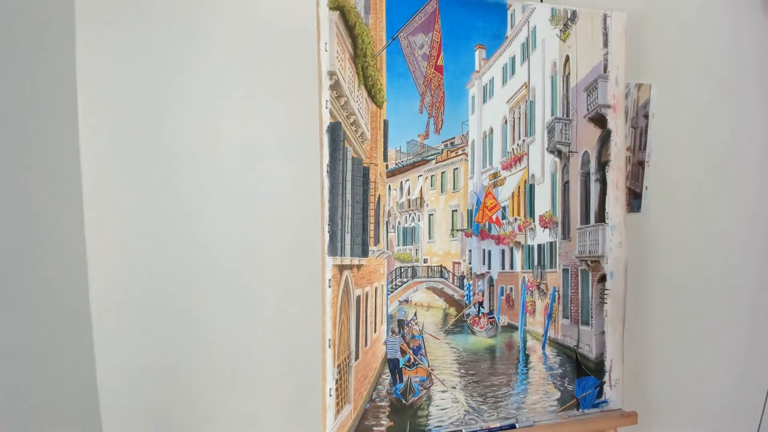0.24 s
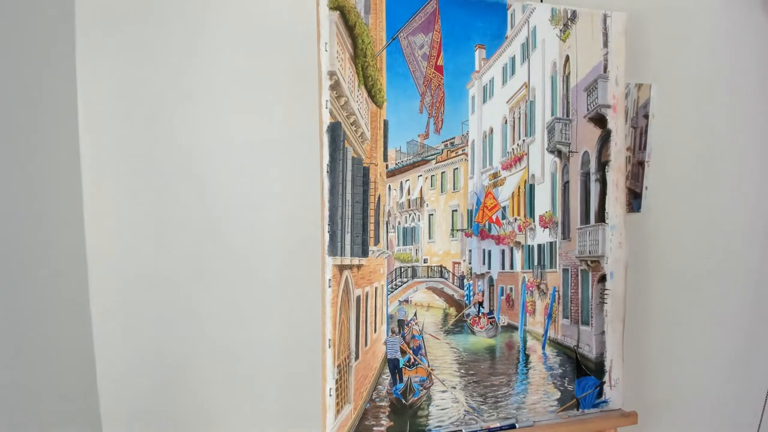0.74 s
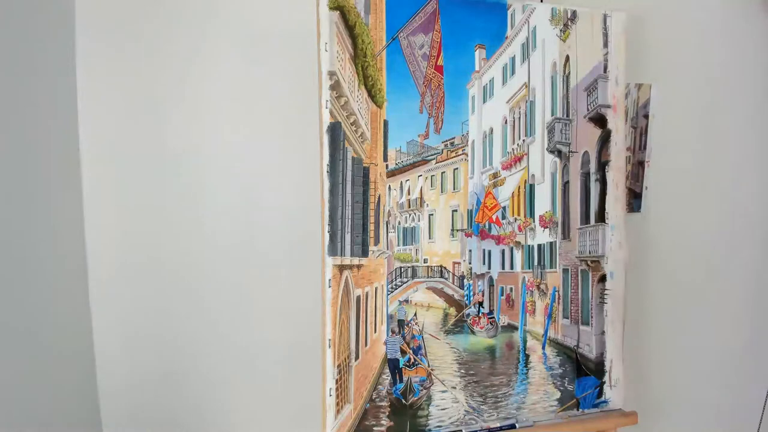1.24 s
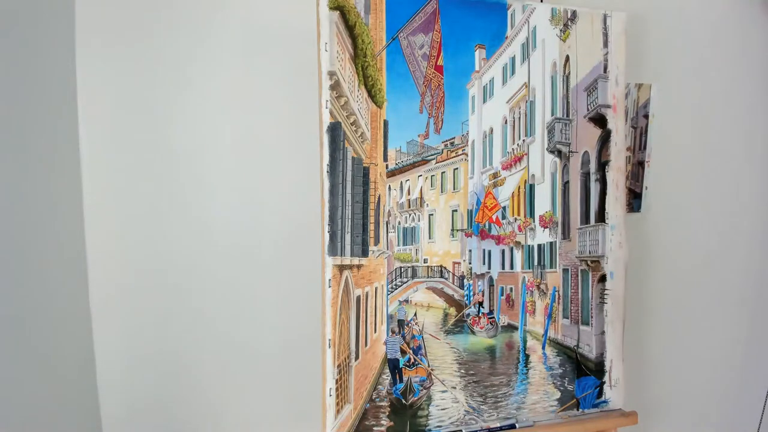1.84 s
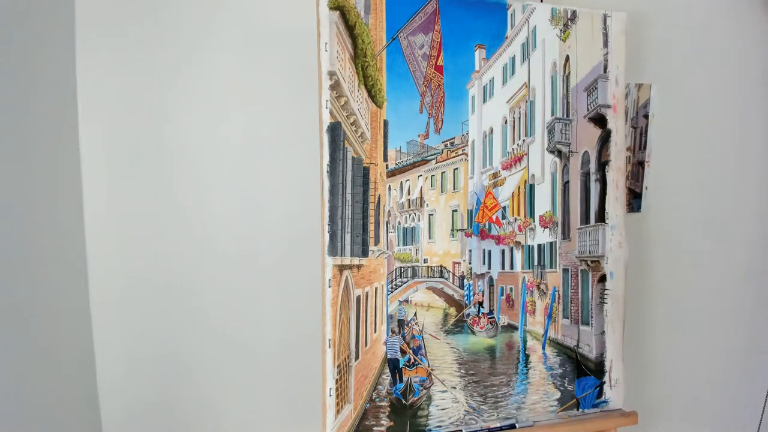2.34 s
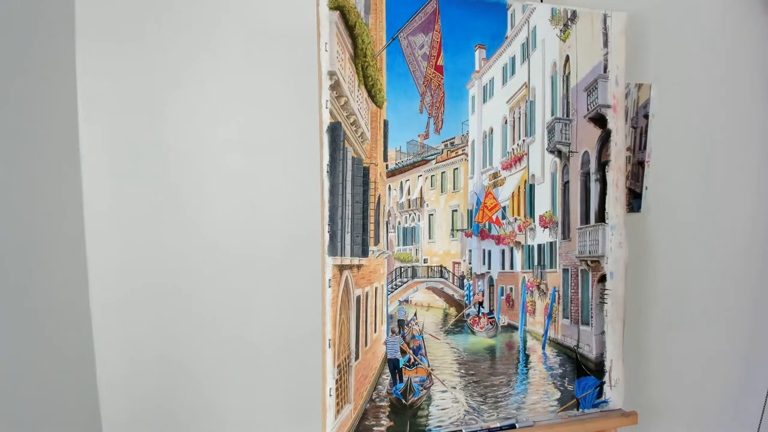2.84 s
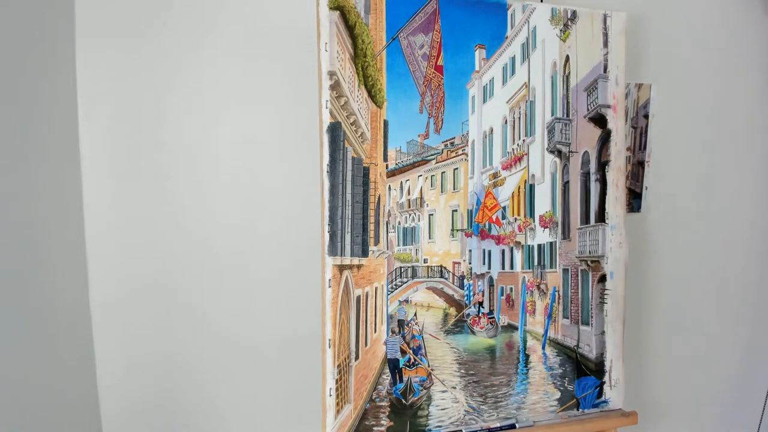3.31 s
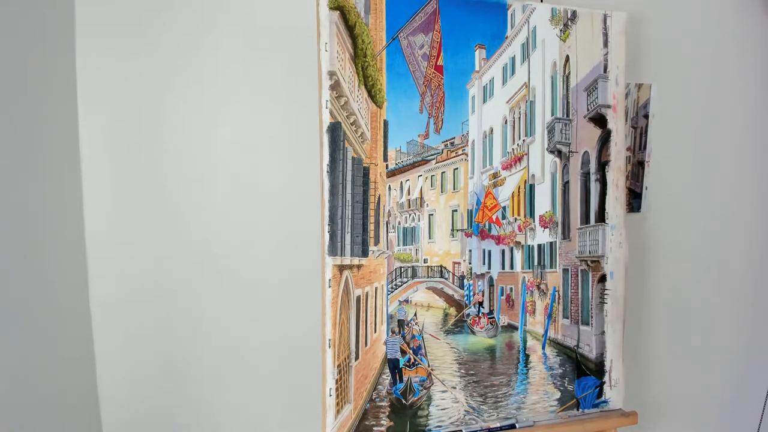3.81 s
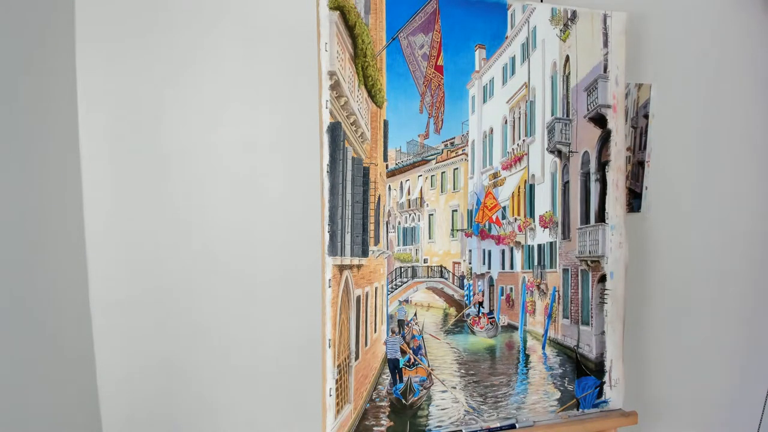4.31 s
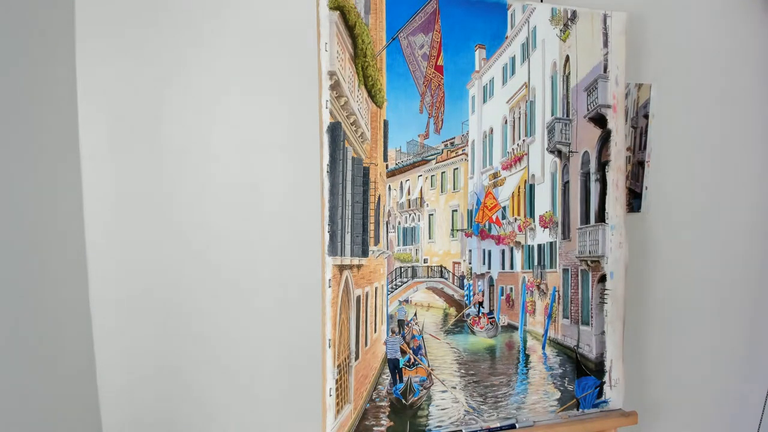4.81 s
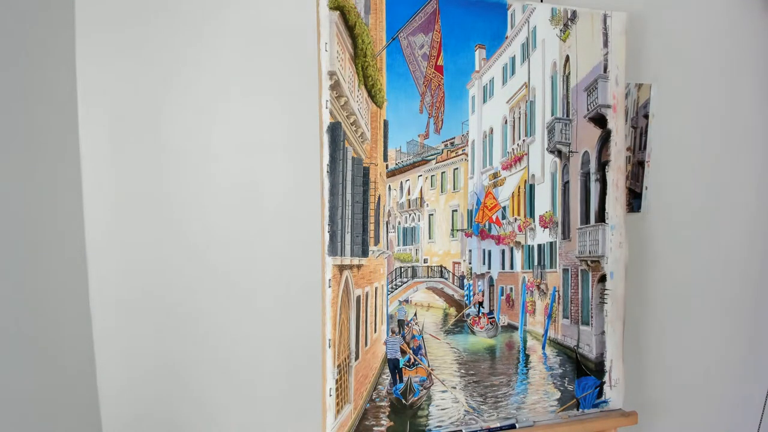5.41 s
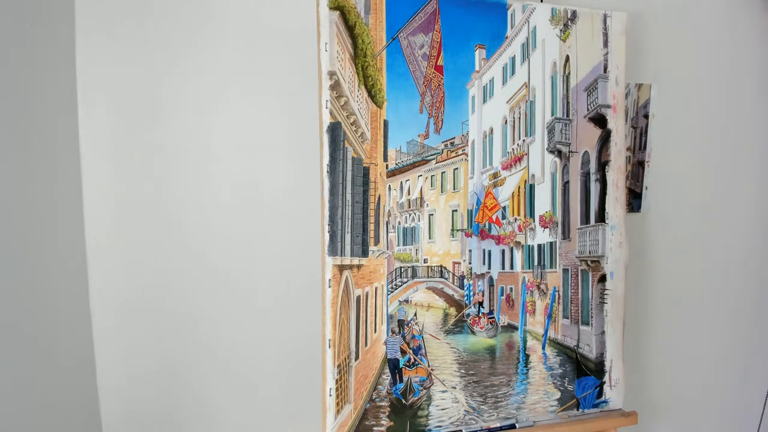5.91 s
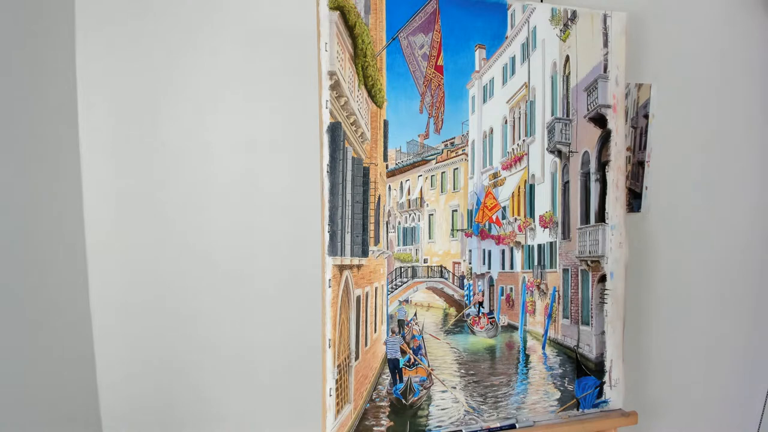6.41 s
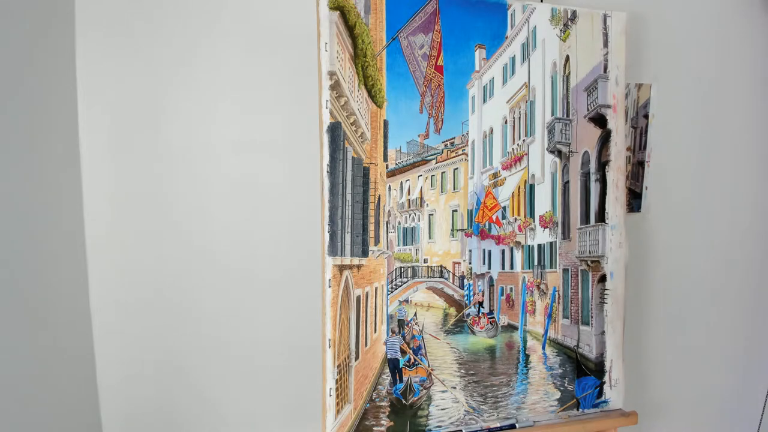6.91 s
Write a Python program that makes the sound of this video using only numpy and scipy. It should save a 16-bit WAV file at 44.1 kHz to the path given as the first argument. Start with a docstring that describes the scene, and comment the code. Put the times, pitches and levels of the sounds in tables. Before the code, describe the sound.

A bare indoor studio with low room air and a faint wavering tone, in mono from a few steps away. Slight ticks and rustling open it; a modest wooden knock comes at 0.5 s, dull low footfalls at 0.7 to 1.0 s, and a louder, fuller double knock at 1.1 s with a rub. Another soft step at 1.5 s, then near quiet with tiny squeaks and a tick until 3.2 s. At 3.26 s an electric pencil sharpener jumps into life: a piercing gear whine, plastic rattle, low growl and splintery hiss, its pitch sagging and lurching as the blade bites, growing slightly louder. Switched off at 5.0 s, it slides down in pitch with loose clattering gears and a bright tick, gone by about 5.3 s. Faint thuds of steps at 5.5 to 5.7 s precede a hollow, woody clunk at 5.85 s with quick bounces, a small gritty slide and two ticks near 6.2 s. Quiet air remains to about 7 s.

```python
"""Electric pencil sharpener in a bare studio

Mono, from a few steps away. Two knocks and some soft footfalls come first. Then the geared motor whines,
sagging as the blade bites into the wood, and runs down; a hollow clunk follows as something is set down.
The pencil's bite sets the motor's speed, and the speed sets the pitch and the chatter of the gears.
Knocks, steps and clunk are decaying noise and struck modes; faint air, rubs and squeaks lie behind."""
import sys
import numpy as np
from scipy import signal
from scipy.fft import rfft, irfft
from scipy.io import wavfile
from scipy.ndimage import uniform_filter1d

SR = 44100
rng = np.random.default_rng(int(sys.argv[2]) if len(sys.argv) > 2 else 0)


def master(y):
    """Save y as 16-bit WAV."""
    cut = np.clip(np.atleast_2d(y).T, -1, 1)
    pcm = np.round(cut * 32767)  # scale
    wavfile.write(sys.argv[1], SR, pcm.astype(np.int16))


N = 315315
TIME = np.arange(N) / SR  # s
AGE = np.arange(SR * 3 // 4) / SR  # time since a blow, s

ON_S, OFF_S = 3.26, 5.01  # the motor is switched on and off
ENGAGE_S = 3.315  # the slack in the gears is taken up
PENCIL_IN_S, PENCIL_OUT_S = 3.345, 4.94  # the blade meets the wood and leaves it
BACKLASH_S = 5.04  # about when the undriven gears begin to run loose
FREE_MESH_HZ = 2552  # tooth-mesh pitch with no load


def sharpener(teeth_db=5.5, throb=0.15, lumpy_db=3.5, growl_db=-2):
    """Gear whine, rattling gears in a plastic housing and a blade that splinters the wood."""
    # Colour of the shaking body. Each row: frequency in Hz, relative density in dB per Hz.
    rumble_colour = [(41, -53.5), (70, -34.5), (102, -9.5), (146, -20), (200, -7), (262, -22), (300, -10.5),
                     (365, -15), (489, 2.5), (632, -11), (837, -0.5), (912, -12), (1300, -12.5),
                     (1690, -38.5), (2860, -120)]
    # Colour of the chattering teeth. Each row: frequency in Hz, relative density in dB per Hz.
    rattle_colour = [(900, -5.5), (1400, 7.5), (2100, 6.5), (3100, 0), (3900, -2), (5200, 6.5), (7000, -3),
                     (10000, -10.5), (15000, -26)]
    # Colour of the cutting blade. Each row: frequency in Hz, relative density in dB per Hz.
    hiss_colour = [(3500, -23.5), (5000, -8), (6500, 8.5), (7700, 0), (8400, 15.5), (9200, 7), (10200, 8.5),
                   (11100, 0), (12200, 1), (15000, 3.5), (16000, -6)]
    # Colour of the loose, undriven gears. Each row: frequency in Hz, relative density in dB per Hz.
    clatter_colour = [(110, -22), (230, -8), (400, -22), (850, -6.5), (1150, -7), (1500, 1), (2400, -3.5),
                      (3000, -7), (3900, 2), (5000, -4), (7000, -11.5), (10000, -23)]
    # Ringing of the housing. Each row: frequency in Hz, width in Hz, mean level in dB against the rattle.
    housing_modes = [(1709, 37, -4.5), (2600, 97, -8.5), (3900, 200, -2.5), (5170, 210, -2)]
    # The blade catches in the wood. Each row: start in seconds, level in dB ahead of the envelope.
    catches = [(3.488, -47), (3.66, -31), (3.92, -31), (4.3, -36), (4.641, -33.5)]
    growl_hz, empty_growl_db = 353, -13.5  # below this pitch the rumble is weaker without wood

    mesh_hz, sag_hz, accent_db = motor()
    speed = mesh_hz / FREE_MESH_HZ
    rumble, rattle, hiss, clatter = machine_levels(speed)
    whine, chirps, shaft = gear_whine(mesh_hz, sag_hz, accent_db, rattle)
    turning = 1 + throb * np.sin(shaft) + throb * np.sin(shaft / 2)

    contacts = grains(5000, 2.8) * turning
    housing = 0
    for k, (hz, width, db) in enumerate(housing_modes):
        mode = rms_one(resonate(contacts, hz, width))
        housing = housing + (-1) ** k * from_db(db + 2 * drift(25)) * mode  # neighbours in opposite polarity
    teeth = from_db(teeth_db) * coloured(grains(6000, 4) * turning, rattle_colour)
    loose_gears = clatter * coloured(grains(4000, 3.5), clatter_colour)
    gears = rattle * (teeth + housing) + loose_gears
    blade = hiss * from_db(drift(60)) * coloured(grains(12000, 3.3) * turning, hiss_colour)

    bites = sum(from_db(db) * swell(s, 0.012, 0.14) for s, db in catches)
    shake = coloured(grains(900, 2.2) * from_db(2 * drift(55)), rumble_colour)
    # the deepest part comes in lumps as the blade works through the grain
    low_pass = signal.butter(3, growl_hz, fs=SR, output="sos")
    growl = signal.sosfiltfilt(low_pass, shake)
    growl_level_db = growl_db + empty_growl_db * (1 - wood_in_blade()) + lumpy_db * drift(22)
    body = (rumble + bites) * (shake - growl)
    body = body + (rumble + bites / 2) * growl * from_db(growl_level_db)

    grinding = studio(gears + blade + chirps, t60=0.027, wet_db=-9.5)
    return studio(whine, t60=.4, wet_db=-4.5) + grinding + body + last_contacts(speed)


def motor():
    """The motor spins up, sags under load and coasts to rest: mesh pitch (Hz), sag (Hz), accent (dB)."""
    # The pencil is pressed into the blade. Each row: start in seconds, end in seconds, mesh-pitch sag
    # at the start in Hz, at the end in Hz (both ahead of the inertia), whine accent in dB ahead of scaling.
    presses = [(3.371, 3.563, 237.7, 105.4, -1.5), (3.67, 3.716, 111.3, 100, 1),
               (3.847, 3.926, 218.2, 287.7, -0.5), (3.924, 4.049, 193.9, 184.8, -0.5),
               (4.272, 4.438, 165.9, 174.6, 1), (4.442, 4.528, 280, 373, -3),
               (4.524, 4.625, 101.6, 75.65, -2), (4.614, 4.74, 129.6, 63.6, 0.5),
               (4.737, 4.828, 175, 205, 0), (4.809, 4.904, 79.84, 65.2, 1),
               (4.904, 5.015, 140.6, 98.3, 0.5)]
    spin_up_s, inertia_s = .02, .016  # time constants of the start and of the response to load
    coast_s, power_fade_s = .1, 0.018  # time constants of the slowing and of the dying drive

    powered = np.minimum(TIME, OFF_S - .02)  # the last load is held from here on
    sag, accent = np.zeros(N), np.zeros(N)
    for start, end, first_hz, last_hz, db in presses:
        held = (powered >= start) & (powered < end)
        sag = np.where(held, np.interp(powered, [start, end], [first_hz, last_hz]), sag)
        accent = np.where(held, db, accent)
    sag = lagging(sag, inertia_s)
    spin_up = 1 - np.exp(-np.maximum(TIME - ON_S, 0) / spin_up_s)
    coasting = lagging(np.exp(-np.maximum(TIME - OFF_S, 0) / coast_s), power_fade_s)
    return (FREE_MESH_HZ - sag) * spin_up * coasting, sag, lagging(accent, inertia_s)


def machine_levels(speed):
    """Rumble, rattle, hiss and loose clatter follow powers of the speed; wood strengthens the hiss."""
    # levels at full speed ahead of the changes below, and the power of the speed that each follows
    rumble_db, rumble_power = -37, 1.6
    rattle_db, rattle_power = -40.5, 3.1
    hiss_db, hiss_power = -29.5, 1.8
    clatter_db, clatter_power = -27.5, 0.67
    empty_blade_db, backlash_hiss_db = -6.5, 8.5  # hiss change without wood, and with loose gears
    deeper_db_per_s = 1.9  # the cut grows louder as more of the point meets the blade
    start_jolt = 0.71  # at switch-on the gears jolt as if at this share of full speed

    loose = after(BACKLASH_S - .01, 0.032)
    driven = after(ON_S, 0.012) - after(OFF_S - .025, 0.055)
    vigour = np.maximum(speed, start_jolt * driven)
    middle_s = (PENCIL_IN_S + PENCIL_OUT_S) / 2
    deeper_db = deeper_db_per_s * (np.clip(TIME, PENCIL_IN_S, PENCIL_OUT_S) - middle_s)
    rumble = from_db(rumble_db + deeper_db) * speed ** rumble_power * after(ENGAGE_S, 0.012) * driven
    rattle = from_db(rattle_db) * vigour ** rattle_power
    blade_db = hiss_db + deeper_db + empty_blade_db * (1 - wood_in_blade()) + backlash_hiss_db * loose
    hiss = from_db(blade_db) * vigour ** hiss_power
    clatter = from_db(clatter_db) * speed ** clatter_power * loose * moving()
    return rumble, rattle, hiss, clatter


def gear_whine(mesh_hz, sag_hz, accent_db, rattle, flutter=.007, flicker_db=3.0, sideband=0.21,
               coast_db=1, lowest_coast_db=-18, start_chirp_db=-17):
    """Teeth mesh cleanly under steady load, and chatter when the motor runs light or nearly stalls."""
    # Partials of the whine. Each row: multiple of the mesh pitch, base level in dB under firm load,
    # change when running light in dB, change near stall in dB.
    partials = [(1, -29, -10.5, -8), (2, -29.5, -6.5, 8.5), (3, -26, -11, -4), (4, -33.5, -13, -1.5),
                (5, -39.5, -14.5, 1.5)]
    # Second gear stage. Each row: multiple of the mesh pitch, mean level in dB against the rattle.
    second_stage = [(0.703, -1.5), (1.296, -16.5), (3.703, -4.5)]
    # Partials that sweep through the housing's ring as the motor slows.
    # Each row: multiple of the mesh pitch, level in dB ahead of the ring.
    coast_partials = [(1, -10), (2, -19), (3, -25.5), (4, -26), (5, -33), (7, -34)]
    firm_sag_hz, stall_sag_hz = 167.6, 248  # clean meshing from the first, labouring beyond the second
    chirp_hz, chirp_width_hz = 1730, 80

    light = 1 - np.clip(sag_hz / firm_sag_hz, 0, 1) * (1 - after(PENCIL_OUT_S, .02))
    stall = np.clip((sag_hz - stall_sag_hz) / 90, 0, 1)
    coast = after(OFF_S, 0.037)
    turn = 2 * np.pi * np.cumsum(mesh_hz) / SR
    unsteady = 1 + 1.3 * light + stall + (1 - wood_in_blade()) + 2 * coast
    flutter_hz = mesh_hz * flutter * unsteady * drift(350)
    phase = turn + 2 * np.pi * np.cumsum(flutter_hz) / SR
    shaft = phase / 11

    # each partial wavers on its own as different teeth take the load; the lowest fades with the drive
    tone = 0
    for k, db, light_db, stall_db in partials:
        level_db = db + light_db * light + stall_db * stall + flicker_db * drift(70)
        level_db = level_db + lowest_coast_db * coast * (round(k) == 1)
        wobble = 0.87 * drift(90) + rng.uniform(0, 2 * np.pi)
        tone = tone + from_db(level_db) * np.sin(round(k) * phase + wobble)
    # the eleven-tooth pinion is slightly off centre
    tone = tone * (1 + sideband * np.sin(shaft) + sideband * np.sin(2 * shaft + drift(40)))
    tone = tone * from_db(accent_db * (1.5 - coast) + coast_db * coast)
    second = sum(from_db(db + 5.7 * drift(35)) * np.sin(k * phase + drift(90)) for k, db in second_stage)
    tone = tone + (1 - coast) * rattle * second
    # the teeth meet softly while the gears take up their slack and when they turn slowly
    force = np.clip(mesh_hz / 1900, 0, 1) ** 2 * after(3.29, 0.051)

    # at the start, and more so in the run-down, one partial after another sweeps through the housing's ring
    teeth = sum(from_db(db) * np.sin(round(k) * turn) for k, db in coast_partials)
    ringing = resonate(resonate(teeth, chirp_hz, chirp_width_hz), chirp_hz, 350)
    chirps = (coast + from_db(start_chirp_db) * (TIME < ENGAGE_S)) * ringing
    return np.sqrt(2) * force * tone, chirps, shaft


def last_contacts(speed, tick_db=-32):
    """The housing goes on ringing as the gears stop, with one bright tick."""
    ring_db, ring_power = -28.5, 0.97  # level at full speed, and the power of the speed that it follows
    level = from_db(ring_db) * speed ** ring_power * after(BACKLASH_S, .15) * np.sqrt(moving())
    housing = level * rms_one(resonate(resonate(grains(903, 2.6), 1732, 199), 1732, 199))
    tick = noise([(4000, -27), (5500, -3.5), (7000, -11), (9000, 21), (11000, 0), (14000, -10), (16000, -18)])
    return housing + from_db(tick_db) * tick * swell(5.153, 0.0015, 0.089)


def wood_in_blade():
    """1 while the pencil is being cut, else 0, with short ramps."""
    return after(PENCIL_IN_S, 0.0083) - after(PENCIL_OUT_S, .03)


def moving():
    """1 while the gears turn, dying away at 86 dB per second as friction stops them."""
    stop_s, stop_db_per_s = 5.22, 86
    return from_db(-stop_db_per_s * np.maximum(TIME - stop_s, 0))


def knocks(body_lag=0.011, boom_lag=.02, top_hz=6000, top_decay=0.45):
    """Knocks on wooden furniture: a click, then the body, then a low boom; the treble dies first."""
    # Each row: start in seconds, click, body and boom levels in dB ahead of their envelopes,
    # t60 of the click below the treble in seconds (the other parts scale it).
    blows = [(0.46, -39.5, -32.5, -62, 0.56), (1.108, -30.5, -30.5, -59, 0.4),
             (1.121, -36.5, -25.5, -31, 1)]
    # Colour of the click. Each row: frequency in Hz, relative density in dB per Hz.
    click_colour = [(600, -13), (900, -11), (1100, -12.5), (1450, 1), (1750, -4.5), (2400, -11),
                    (3100, -10), (4000, -5.5), (5000, -14), (6000, -14.5), (7800, -24), (11000, -27.5),
                    (15000, -51.5)]
    # Colour of the wooden body. Each row: frequency in Hz, relative density in dB per Hz.
    body_colour = [(110, -14.5), (190, -12.5), (334, 0), (372, -12), (411, -0.5), (444, -8.5), (487, -4.5),
                   (534, -14), (855, -16.5), (1200, -17), (1560, -54.5), (2640, -120)]
    # Colour of the low boom. Each row: frequency in Hz, relative density in dB per Hz.
    boom_colour = [(50, -21), (80, -12), (140, 1.5), (190, -6.5), (260, -34)]

    click = rms_one(studio(noise(click_colour), t60=.12, wet_db=-6.5))
    body, boom = noise(body_colour), noise(boom_colour)
    dull = signal.sosfilt(signal.butter(2, top_hz, fs=SR, output="sos"), click)
    bright = signal.sosfilt(signal.butter(2, top_hz, "high", fs=SR, output="sos"), click)
    out = 0
    for s, click_db, body_db, boom_db, t60 in blows:
        dull_part = dull * swell(s, 0.0061, t60, damped_s=0.27)
        bright_part = bright * swell(s, .002, t60 * top_decay)
        out = out + from_db(click_db) * (dull_part - bright_part)
        out = out + from_db(body_db) * body * swell(s + body_lag, 0.01, t60 * 0.72, damped_s=.3)
        out = out + from_db(boom_db) * boom * swell(s + boom_lag, 0.031, t60 * 1.7, damped_s=0.23)
    return out


def footfalls(sole_db=-13):
    """Each step sets the floor swinging briefly, with a dull pad of the sole."""
    # Each row: start in seconds, level in dB ahead of the envelope, floor pitch in Hz, t60 in seconds.
    steps = [(0.723, -37, 73.5, 0.38), (0.821, -36, 77.4, 0.34), (1.016, -35.5, 77, 0.67),
             (1.49, -40, 77, 0.3), (5.492, -43, 86.3, 0.86), (5.567, -42.5, 174.5, 0.34),
             (5.66, -42, 149, 0.21), (5.735, -41.5, 107.8, 0.27)]
    sole = noise([(60, 6.5), (170, 0.0), (280, -9.5), (450, -20.5)])
    out = 0
    for s, db, hz, t60 in steps:
        pad = from_db(sole_db) * sole * swell(s, 0.01, t60)
        out = out + from_db(db) * (ring(s, hz, 0.02, t60) + pad)
    return out


def clunk(scuff_db=-11.5):
    """A hollow object lands, rocks and slides a little; every touch rings its modes anew."""
    # The clunk with its bounces. Each row: start in seconds, level in dB ahead of modes and scuff.
    touchdowns = [(5.852, -29), (5.877, -24.5), (5.917, -24), (5.985, -32)]
    # Modes of the hollow object. Each row: frequency in Hz, mean relative level in dB, t60 in seconds.
    hollow_modes = [(285.5, -17.5, 0.94), (364, -8.5, 0.35), (406, -8, 0.29), (467, -8, 0.222),
                    (527, -1.5, 0.28), (562, -1, 0.26), (593, 4, 0.33), (678, -22, 0.6)]
    # Colour of the scuff. Each row: frequency in Hz, relative density in dB per Hz.
    scuff_colour = [(35, -65.5), (60, -26), (149, -26), (253, -21), (283, -28), (332, -26.5), (399, -20),
                    (437, -23), (574, -2.5), (808, -25.5), (1110, -33.5), (1400, -27.5), (3110, -40.5),
                    (5620, -41), (14000, -56)]
    slide_at_s, slide_db, slide_rise_s, slide_fall_s = 6.0, -54, .2, .22  # loudest moment, its level

    scuff = rms_one(studio(coloured(grains(3000, 8.2), scuff_colour), t60=0.13, wet_db=-5.5))
    grit = coloured(grains(3100, 1.5), [(1000, -8), (1700, -3.5), (3000, -8), (4000, -1.5), (5000, -7.0),
                                        (6200, -2.5), (7600, -19.0), (9300, -8), (15000, -30.5)])
    out = from_db(slide_db) * hump(slide_at_s, slide_rise_s, slide_fall_s) * grit
    for s, db in touchdowns:
        modes = 0
        for hz, level_db, t60 in hollow_modes:
            gain = from_db(level_db + rng.normal(0, 3.0))
            modes = modes + gain * ring(s + rng.uniform(0, 0.0011), hz, 0.015, t60)
        scrape = from_db(scuff_db) * scuff * swell(s, 0.011, 0.51, damped_s=0.26)
        out = out + from_db(db) * (0.66 * modes + scrape)
    return out


def squeaks(width_hz=450, rise=0.069, fall=0.089):
    """Faint narrow tones: rough friction through a resonance. The first, at 0.65 s, is a brief rattle; the
    others are something smooth that is rubbed and sings faintly."""
    # Each row: loudest moment in seconds, level in dB, pitch in Hz.
    rubbed_tones = [(0.65, -60.5, 3900), (2.1, -77, 4200), (2.24, -77, 4200), (2.309, -79, 4970),
                    (2.721, -82, 5200), (2.82, -73.5, 5440)]
    friction = grains(2000, 8.9)
    out = 0
    for s, db, hz in rubbed_tones:
        out = out + from_db(db) * hump(s, rise, fall) * rms_one(resonate(friction, hz, width_hz))
    return out


def background(air_db=7.5, hiss_db=-79):
    """Room air and hiss as coloured noise, a faint wavering tone, soft rustling and a few ticks."""
    # Colour of the room air. Each row: frequency in Hz, relative density in dB per Hz.
    air_colour = [(18, -44.5), (30, -13.5), (86, -9.5), (118, -6.5), (379, -6), (491, -3), (538, -6),
                  (724, -7), (991, -7.5), (1240, -11), (1760, -15), (1890, -22), (2500, -29), (3250, -54),
                  (5500, -120)]
    # Course of the room air. Each row: time in seconds, level in dB ahead of the lift by air_db.
    air_course = [(0, -68.5), (1.6, -70.5), (3.2, -70.5), (5.5, -71), (7.15, -73)]
    # Wavering tone in the room. Each row: time in seconds, mean pitch in Hz, mean level in dB.
    tone_course = [(0, 1095, -78), (0.9, 1083, -66), (1.6, 1112, -77.5), (2.3, 1002, -67), (3.1, 1009, -76),
                   (7.1, 1011, -77)]
    # Colour of the rustling. Each row: frequency in Hz, relative density in dB per Hz.
    rustle_colour = [(1180, -42), (2000, 1.5), (3460, -5), (5320, -4), (7640, -9.5), (8970, -6),
                     (15000, -17.5)]
    # Soft rubs of handling. Each row: loudest moment in seconds, mean level in dB,
    # rise in seconds, fall in seconds (both for 20 dB).
    rubs = [(0.02, -69.5, .1, 0.43), (0.39, -71.5, .06, 0.44), (0.65, -73, .3, 0.33),
            (1.1, -55.5, .1, 0.35), (1.52, -66, .25, 0.31), (2.05, -76, .3, 1), (2.78, -73, .6, .2)]
    # Small ticks and creaks of handling. Each row: start in seconds, level in dB ahead of the envelope,
    # pitch in Hz, t60 in seconds.
    small_ticks = [(0.15, -60, 888, 0.6), (0.21, -56, 287.3, 0.6), (0.392, -64, 1158, 0.43),
                   (1.951, -49.5, 1750, 0.1), (2.78, -65, 2590, 0.12), (2.801, -75, 5400, 0.18),
                   (6.149, -55, 1398, 0.2), (6.221, -53.5, 1200, 0.15)]
    # Colour of the quiet hiss. Each row: frequency in Hz, relative density in dB per Hz.
    hiss_colour = [(1180, -35), (2000, -7), (3770, -5), (4320, -5), (4830, -8), (5640, -13.5),
                   (15500, -14.5)]

    air = from_db(in_time(air_course)[0] + air_db) * noise(air_colour)
    tone_hz, tone_db = in_time(tone_course)
    tone_phase = 2 * np.pi * np.cumsum(tone_hz + 25 * drift(120)) / SR
    tone = from_db(tone_db + 5.9 * drift(25)) * np.sin(tone_phase)
    # light touches smear out in the room
    touches = rms_one(studio(coloured(grains(900, 11), rustle_colour), t60=0.57, wet_db=6.5))
    strokes = sum(from_db(db) * hump(s, rise, fall) for s, db, rise, fall in rubs)
    rustle = strokes * from_db(0.73 * drift(25)) * touches
    ticks = sum(from_db(db) * ring(s, hz, 0.0018, t60) for s, db, hz, t60 in small_ticks)
    return air + tone + rustle + ticks + from_db(hiss_db) * noise(hiss_colour)


def studio(x, t60, wet_db):
    """Direct sound plus dense reflections from bare walls, at about the same total power."""
    age = TIME[:SR // 2]
    tail = rng.standard_normal(len(age)) * from_db(-60 * age / t60) * (age > .003)
    wet = signal.fftconvolve(x, tail / np.linalg.norm(tail))[:N]
    return (x + from_db(wet_db) * wet) / np.sqrt(1 + from_db(wet_db) ** 2)


def from_db(db):
    """Decibels to gain."""
    return np.exp(np.asarray(db) * (np.log(10) / 20))


def rms_one(x):
    """Scale to rms 1."""
    return x / np.sqrt(np.mean(x ** 2) + 1e-20)


def in_time(rows):
    """Each column of a curve at every sample."""
    s, *columns = np.transpose(rows)
    return [np.interp(TIME, s, c) for c in columns]


def drift(rate):
    """Random wander of rms 1, joining `rate` random points per second by straight lines."""
    knots = rng.standard_normal(int(N / SR * 2000))
    return rms_one(np.interp(TIME * rate, np.arange(len(knots)), knots))


def coloured(x, spectrum):
    """Give a steady sound a spectrum that falls by 30 dB per octave past its ends; rms 1."""
    hz, db = np.transpose(spectrum)
    octave = np.log2(np.maximum(np.fft.rfftfreq(N, 1 / SR), 1))
    known = np.log2(hz)
    outside = np.abs(octave - np.clip(octave, known[0], known[-1]))
    gain = from_db(np.interp(octave, known, db) - 30 * outside)
    return rms_one(irfft(rfft(x.astype(np.float32)) * gain.astype(np.float32), N))


def noise(spectrum):
    """Steady noise of a given colour."""
    return coloured(rng.standard_normal(N), spectrum)


def grains(per_s, spread_db):
    """Random clicks of uneven size; rms 1."""
    clicks = (rng.random(N) < per_s / SR) * rng.choice([-1, 1], N)
    size = from_db(spread_db * np.clip(rng.standard_normal(N), -2, 2))
    return rms_one(clicks * size)


def resonate(x, hz, width):
    """A resonance with gain 1 on top."""
    r = np.exp(-np.pi * width / SR)
    feedback = [1, -2 * r * np.cos(2 * np.pi * hz / SR), r * r]
    return signal.lfilter(np.array([1, 0, -1]) * (1 - r * r) / 2, feedback, x)


def decay(rise, t60):
    """Level of a blow as the room fills and empties."""
    return (1 - np.exp(-(AGE / rise) ** 2)) * from_db(-60 * AGE / t60)


def swell(start, rise, t60, damped_s=9):
    """Envelope of a blow, which may be damped after a while."""
    return place(decay(rise, t60) / (1 + (AGE / damped_s) ** 12), start)


def ring(start, hz, rise, t60):
    """One struck mode: a decaying sine."""
    return place(decay(rise, t60) * np.sin(2 * np.pi * hz * AGE), start)


def place(sound, start):
    """Put a short sound into silence."""
    out = np.zeros(N)
    first = min(max(round(start * SR), 0), N - 1)
    out[first:first + len(sound)] = sound[:N - first]
    return out


def after(start, fade):
    """Goes from 0 to 1 from a given moment, over the fade in seconds."""
    return np.clip((TIME - start) / fade, 0, 1)


def hump(peak, rise, fall):
    """A stroke that swells to its peak and dies away; rise and fall are the times for 20 dB."""
    distance = np.maximum((peak - TIME) / rise, (TIME - peak) / fall)
    return from_db(-20 * np.minimum(distance, 10))


def lagging(x, seconds):
    """Follow a control with some inertia."""
    r = np.exp(-1 / (seconds * SR))
    return signal.lfilter([1 - r], [1, -r], x + 1e-18)


def suppress(x, margin_db=8, depth_db=-4):
    """Noise suppressor: each frequency is turned down while it lies near its own floor."""
    frames = signal.stft(x, nperseg=1024)[2]
    power = uniform_filter1d(np.abs(frames) ** 2, size=3, axis=-1)  # smoothed over time
    power = uniform_filter1d(power, size=3, axis=-2)  # and over frequency
    floor = uniform_filter1d(np.quantile(power, .25, axis=-1, keepdims=True), size=5, axis=-2)
    threshold = floor * from_db(margin_db) ** 2
    opening = power ** 2 / (power ** 2 + threshold ** 2 + 1e-40)
    return signal.istft(frames * from_db(depth_db * (1 - opening)), nperseg=1024)[1][..., :N]


def scene():
    """All sources, the same in both channels."""
    mono = sharpener() + knocks() + footfalls() + clunk() + squeaks() + background()
    return np.stack([mono, mono])


def record(dry):
    """One microphone feeds both channels; faint noise is suppressed, deep bass and top are cut."""
    cutoff_hz = 15800
    quieted = suppress(dry.mean(axis=0))
    thin = signal.sosfilt(signal.butter(2, 40, "high", fs=SR, output="sos"), quieted)
    mono = signal.sosfilt(signal.ellip(12, .1, 80, cutoff_hz, fs=SR, output="sos"), thin)
    return np.stack([mono, mono])


dry = scene()
out = record(dry)
master(out)
```